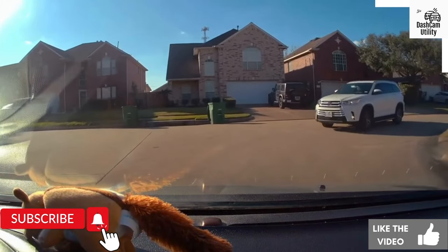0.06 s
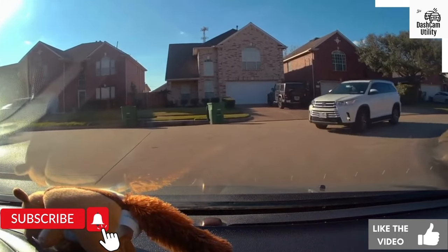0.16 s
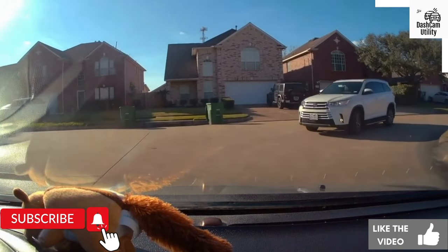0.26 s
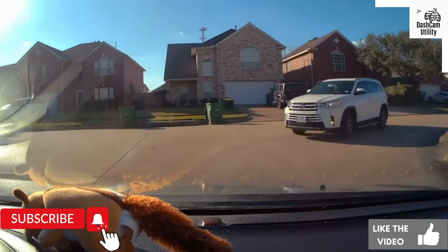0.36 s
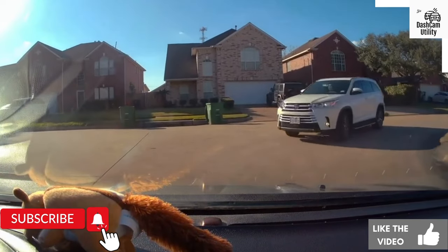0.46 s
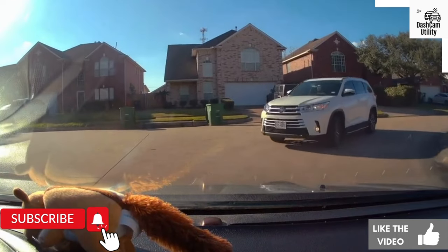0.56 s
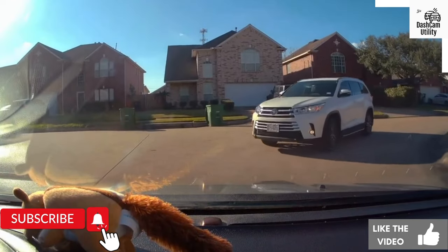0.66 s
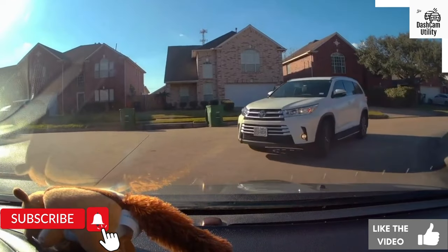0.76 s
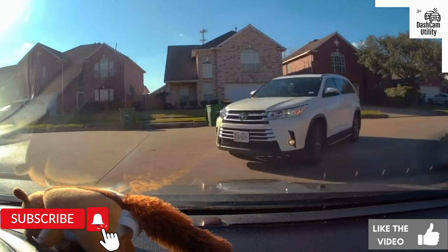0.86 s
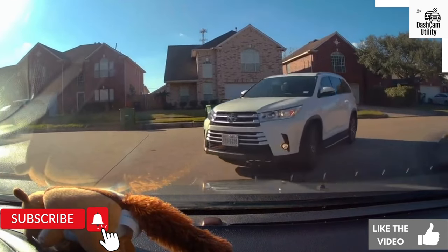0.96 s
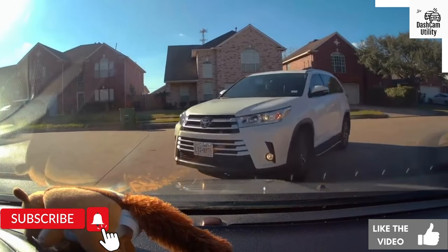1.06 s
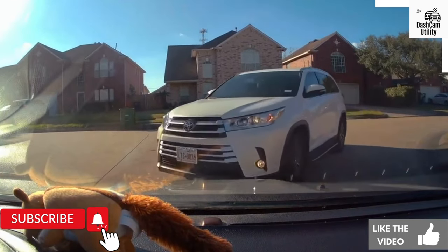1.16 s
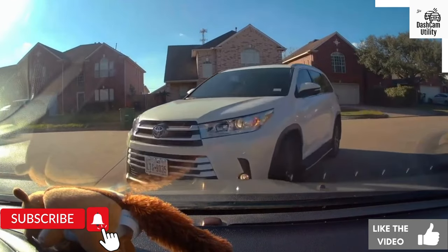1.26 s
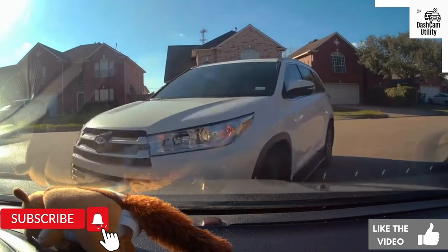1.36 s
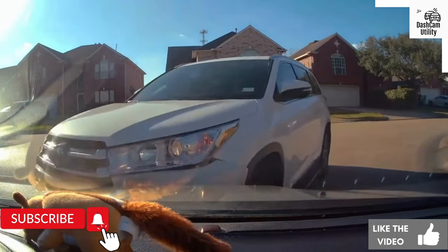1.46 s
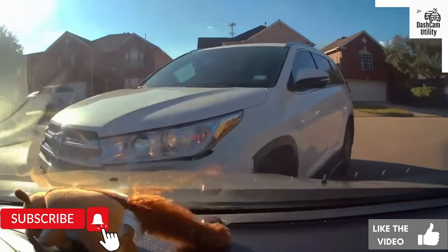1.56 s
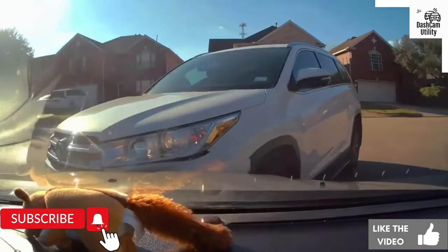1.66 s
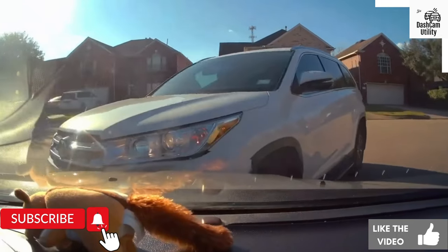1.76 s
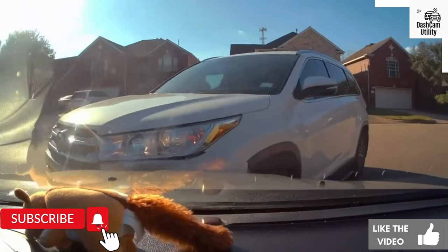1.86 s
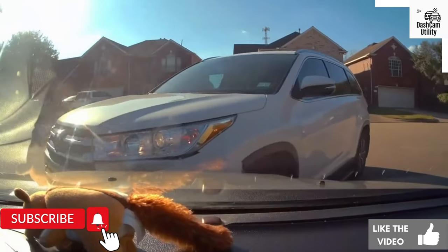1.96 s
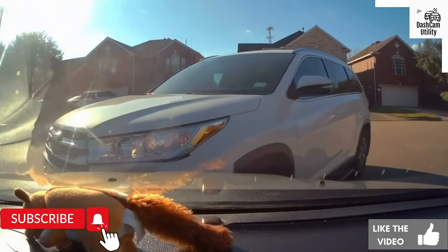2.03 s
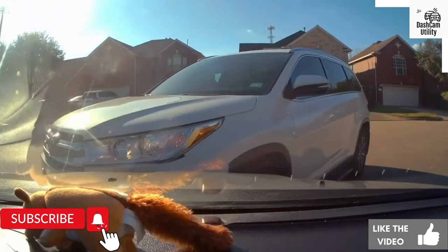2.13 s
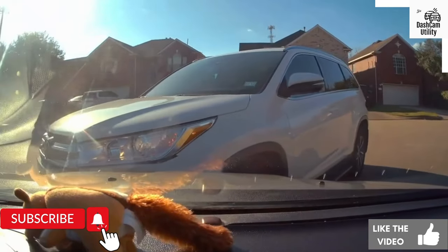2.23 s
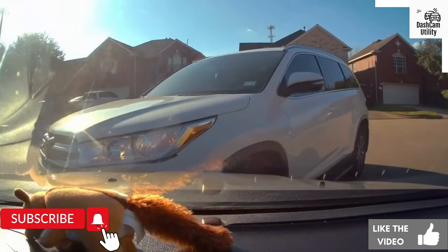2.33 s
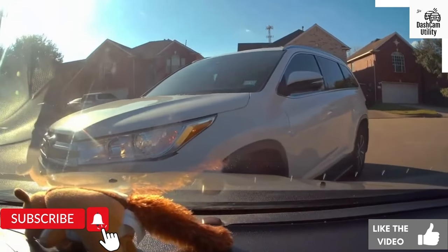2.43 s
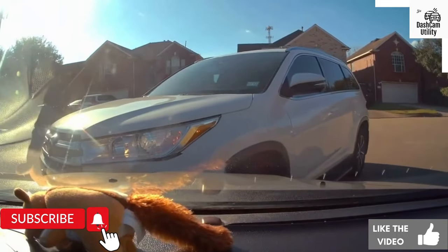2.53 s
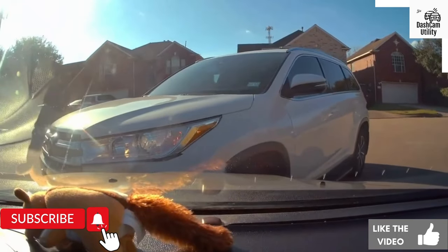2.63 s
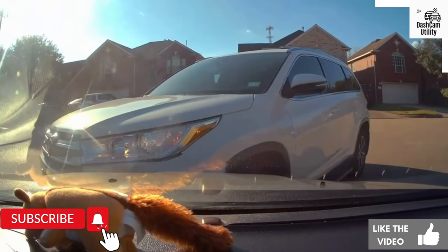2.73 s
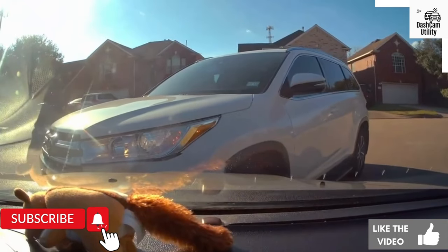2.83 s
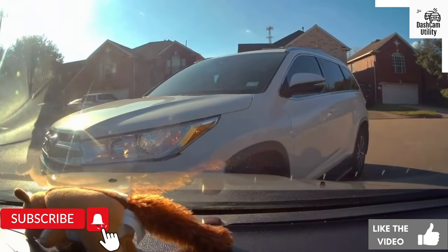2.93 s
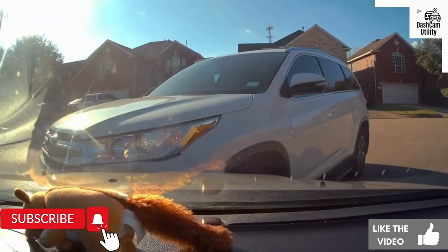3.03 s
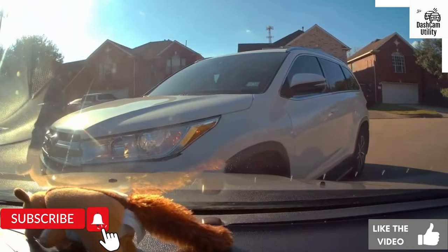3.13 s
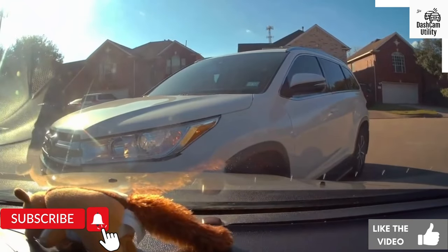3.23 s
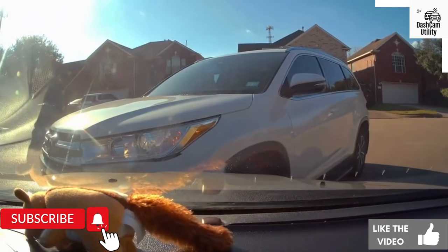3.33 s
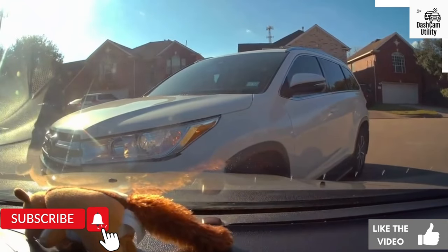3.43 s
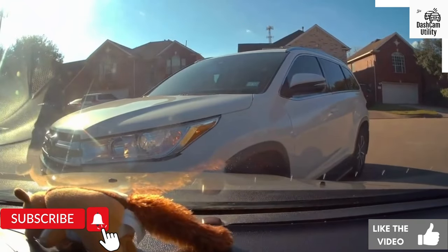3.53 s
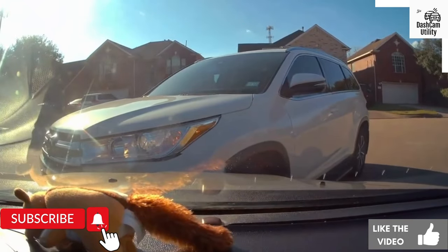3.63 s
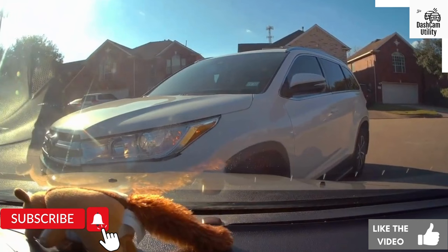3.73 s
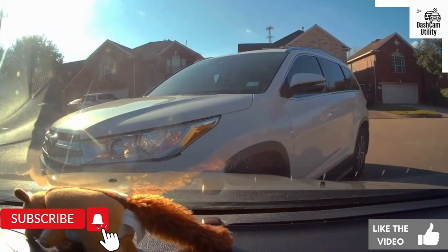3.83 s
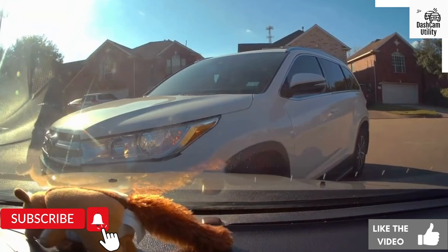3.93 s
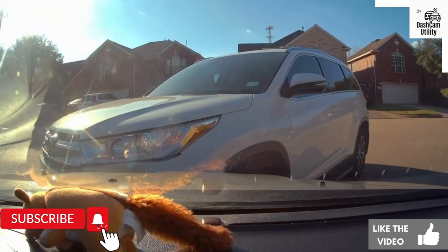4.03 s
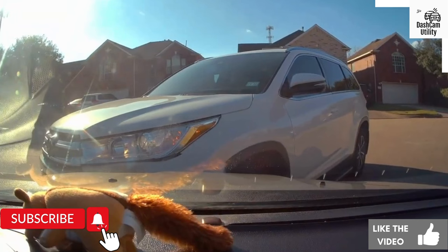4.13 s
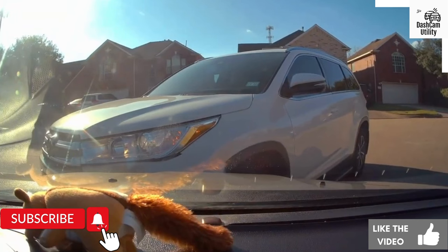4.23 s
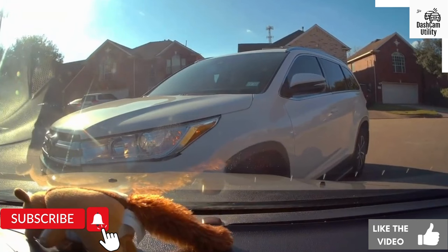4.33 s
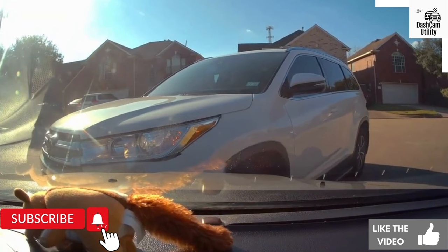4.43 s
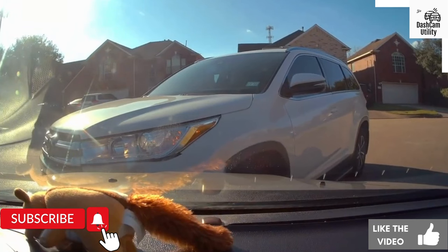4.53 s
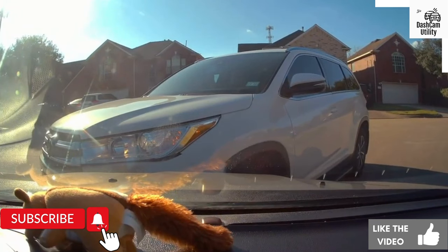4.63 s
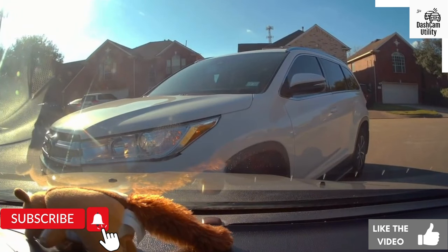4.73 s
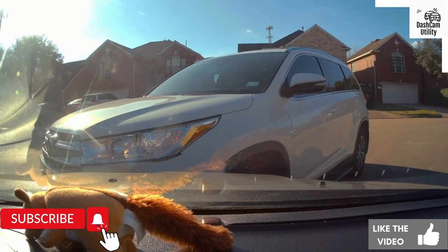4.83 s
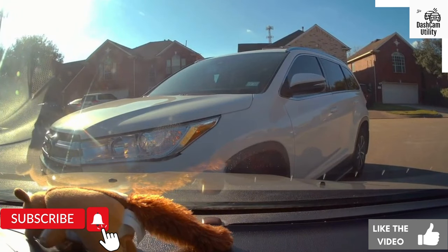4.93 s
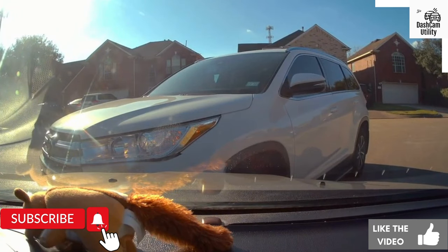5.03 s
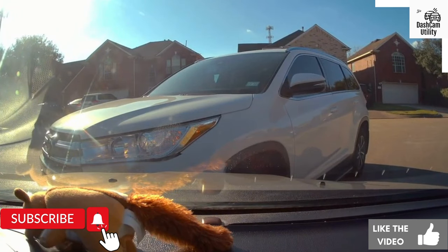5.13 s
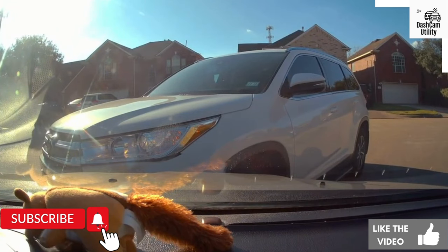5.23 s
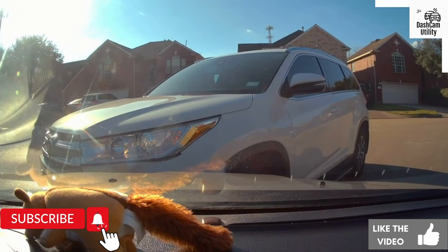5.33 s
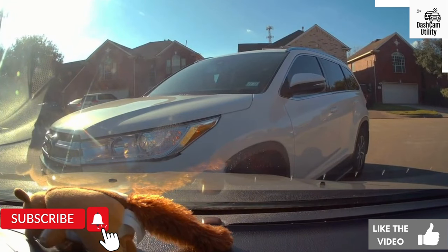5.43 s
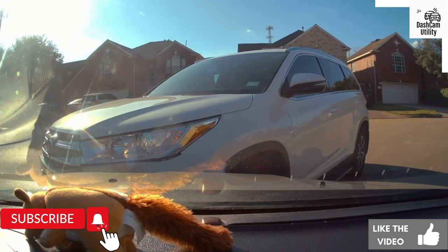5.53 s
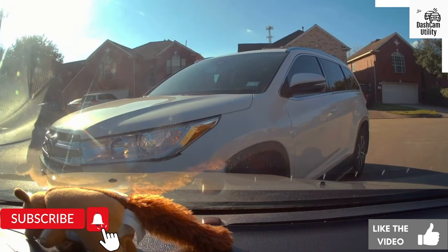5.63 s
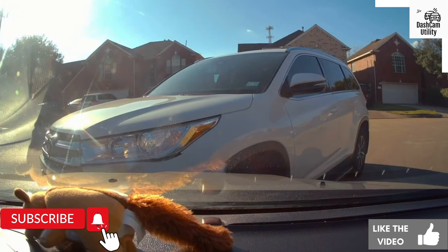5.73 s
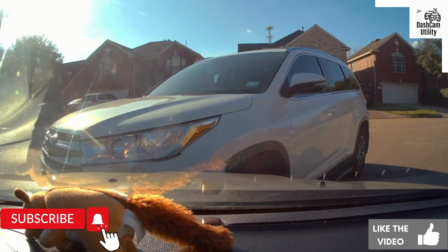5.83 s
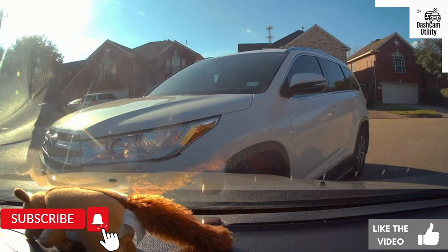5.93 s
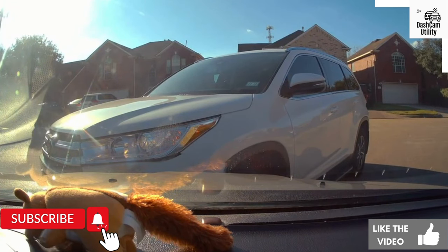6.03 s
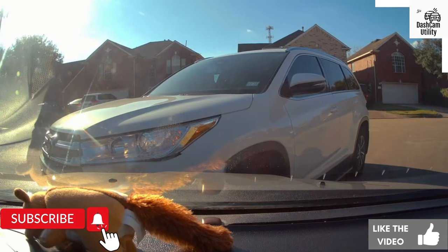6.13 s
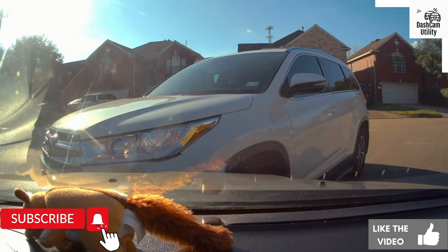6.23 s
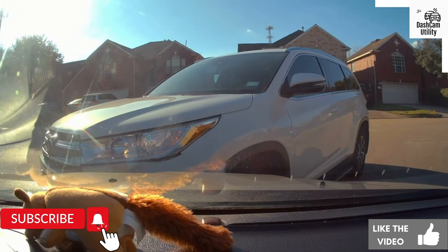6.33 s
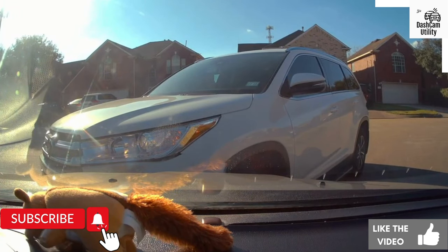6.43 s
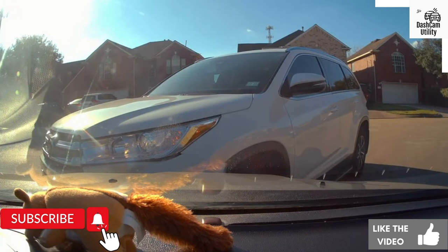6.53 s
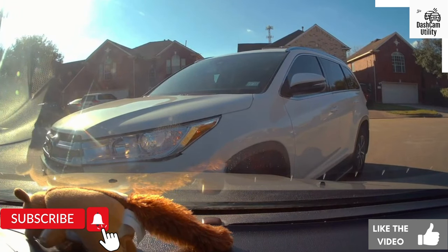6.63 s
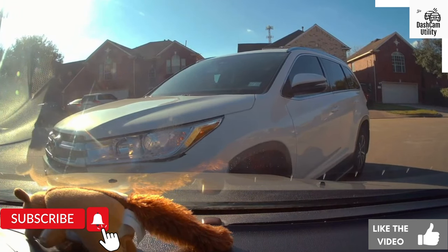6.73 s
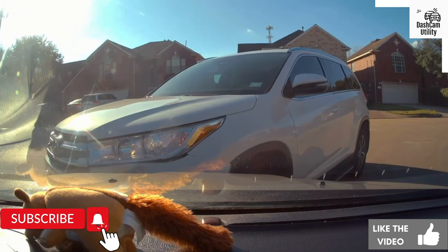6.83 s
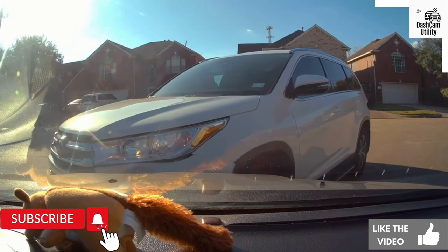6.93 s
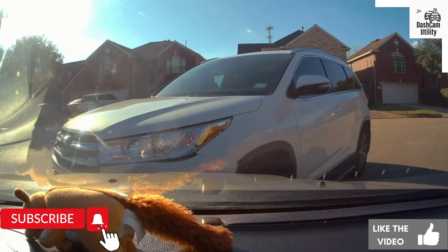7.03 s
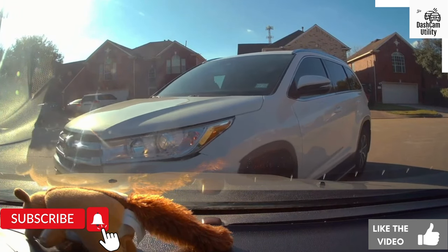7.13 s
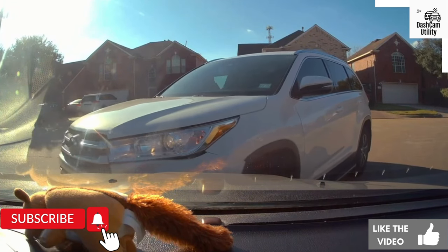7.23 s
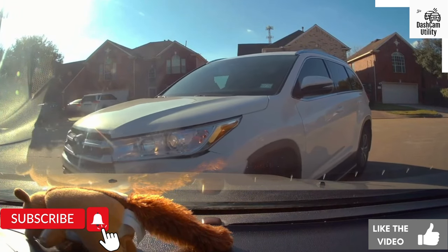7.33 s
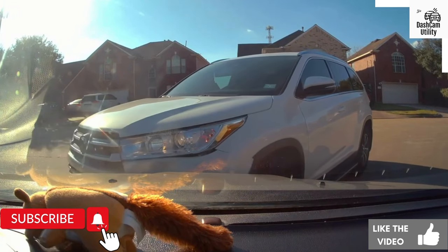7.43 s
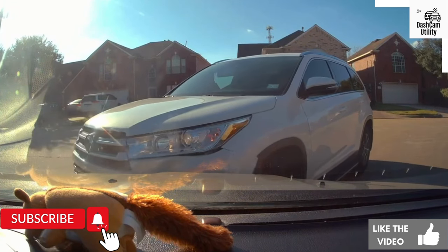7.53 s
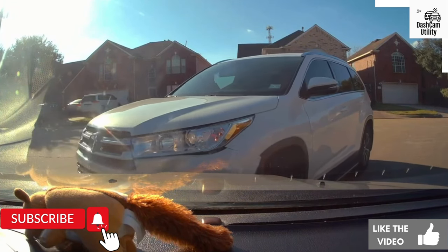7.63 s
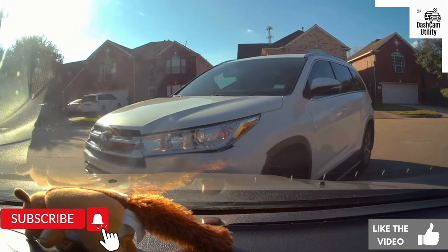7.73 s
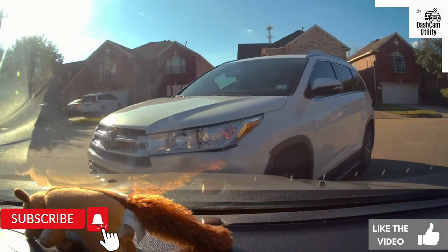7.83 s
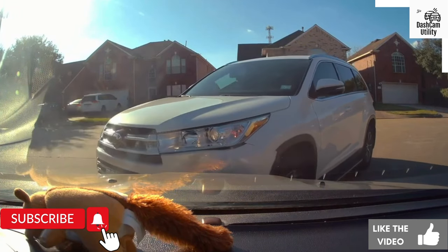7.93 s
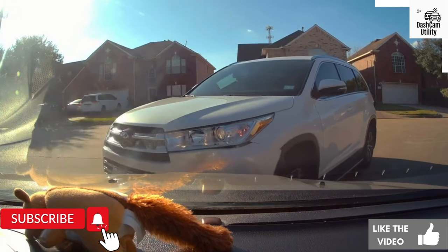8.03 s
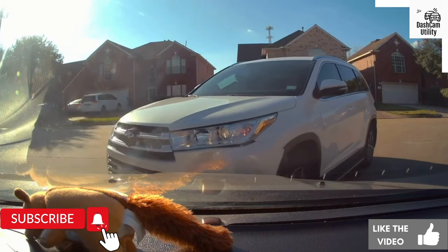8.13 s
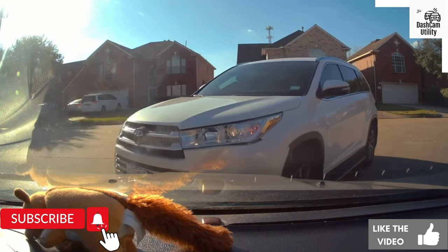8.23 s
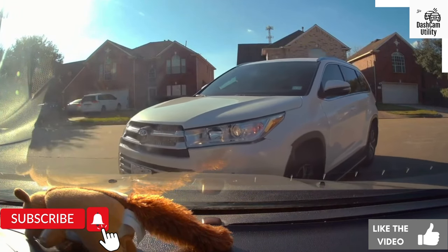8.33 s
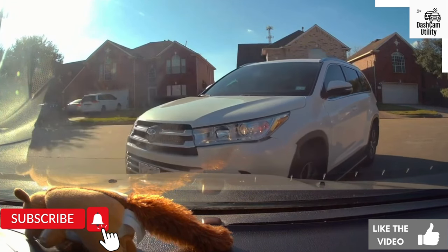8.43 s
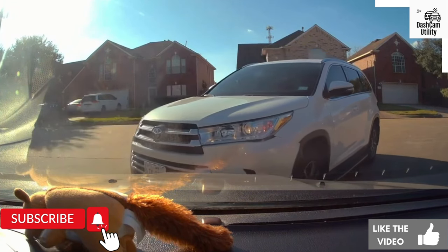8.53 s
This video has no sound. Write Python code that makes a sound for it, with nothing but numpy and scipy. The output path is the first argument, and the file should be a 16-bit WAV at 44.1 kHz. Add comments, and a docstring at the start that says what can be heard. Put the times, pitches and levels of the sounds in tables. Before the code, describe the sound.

Inside a quietly rumbling car, braking tyres drone, then a sudden booming crash crunches metal and plastic, debris trickles, and loose things knock afterwards.

```python
"""A hard boom and crunch breaks into the quiet cabin of a car as it is hit head-on at low speed.
The microphone sits on the dashboard, close to the trim; the front end buckles a bonnet's length away.
The blow rings the body modes and overloads the microphone; random fractures make crunch and plastic debris.
Behind it the engine, a stack of sines, sinks to idle over tyre and vent noise. Loose things knock about
the cabin, and short runs of slips scrape the trim, mostly after the crash."""
import sys
import numpy as np
from scipy import signal
from scipy.fft import rfft, irfft, next_fast_len
from scipy.io import wavfile
from scipy.ndimage import uniform_filter1d

SR = 44100
rng = np.random.default_rng(int(sys.argv[2]) if len(sys.argv) > 2 else 0)


def int16_out(signal):
    """Quantize to a 16-bit WAV file."""
    q = np.round(np.clip(np.atleast_2d(signal).T, -1, 1) * 32767)
    wavfile.write(sys.argv[1], SR, q.astype(np.int16))


N = 377937
TIME = np.arange(N) / SR
SHORT = TIME[:SR // 2]  # time axis of a single hit, half a second

# Every spectrum gives a colour only, columns: f/Hz, relative level/dB
# low rumble through the cabin
RUMBLE_COLOUR = [(15, -16), (30, 6), (60, -1.5), (120, -2), (190, -3), (260, -7.5), (380, -9.5), (500, -19),
                 (750, -27), (1500, -46)]
# air from the vents, also the scrub of braked tyres
AIR_COLOUR = [(300, -22.5), (600, -3), (820, -4.5), (970, 4.5), (1250, -5), (1700, -17), (2300, -18.5),
              (2900, -15.5), (3600, -23.5), (4200, -21), (4700, -22.5), (5700, -28.5), (7600, -28)]
# tyres on concrete
TYRE_COLOUR = [(12, -15), (25, -3), (70, 8.5), (100, -4), (130, -1.5), (170, 2), (230, -5), (500, -59.5)]
# shuddering chassis
CHASSIS_COLOUR = [(12, -24), (25, -2), (38, -9), (53, -2), (70, -8.5), (100, -7), (140, -25), (300, -68.5)]
# booming car body
BODY_COLOUR = [(40, -29), (90, -10.5), (120, 6.5), (150, 0), (190, 2), (260, -3), (340, -4.5), (430, -13),
               (600, -19.5), (1500, -69)]
# bent sheet metal panels
PANEL_COLOUR = [(200, -25), (400, 5), (480, -7.5), (555, 3.5), (610, -3.5), (670, 2.5), (760, -4),
                (900, -5.5), (1040, -0.5), (1200, -8.5), (1370, -12), (1650, -28.5), (2200, -23.5),
                (5000, -54.5)]
# hard plastic shards, also sand under the tyres and creaking trim
SHARD_COLOUR = [(700, -14.5), (1050, 7), (1400, 9.5), (1650, 3), (1900, -5.5), (2200, -2), (2550, 1),
                (2900, 5.5), (3250, -3), (3500, -7.5), (3850, -4), (4150, -10.5), (4650, -0.5),
                (5200, -15.5), (5700, -18.5), (7500, -23.5)]
# plastic trim close to the microphone
TRIM_COLOUR = [(300, 11), (600, -7), (1200, -6), (1600, 5), (2100, 2.5), (2500, 5.5), (2950, 10.5),
               (3250, -1.5), (3500, -1), (4050, -3), (4650, 6), (5200, 0.5), (5700, -6), (6300, -1),
               (7600, -7.5)]
# dashboard drumming under a scrape
DASH_COLOUR = [(40, -26), (85, -24.5), (122, 17), (155, -3.5), (220, 2), (300, -6), (420, -13.5),
               (800, -65)]
# fragments tumbling together
CLATTER_COLOUR = [(600, -8), (1000, 19.5), (1350, 1.5), (1900, -12), (2450, 2), (2900, 8.5), (3450, -11.5),
                  (3850, -1.5), (4150, -10), (4650, 0), (5600, -14.5), (7500, -22)]
# plastic crackling under strain
CRACKLE_COLOUR = [(400, -16), (800, -0.5), (1200, 6), (1900, -24), (2700, -3), (4200, -10), (7500, -27)]
# splitting bumper and grille
CRACK_COLOUR = [(300, -6.5), (700, 10.5), (1300, 18), (1900, 2), (2900, 4.5), (3600, -4), (4700, -2.5),
                (5800, -15), (7500, -10)]
# things shifting in the cabin
RUSTLE_COLOUR = [(400, -10), (1100, 10), (1700, -1.5), (2900, -1), (3600, -6), (4700, -8), (7500, -15.5)]

# level of the cabin background, columns: t/s, level/dB (the vent air follows by half)
BACKGROUND_LEVEL = [(0, 6), (3, 4), (4.1, -1.5), (5.6, 5), (6.4, 3), (7.7, 5), (8.57, -1)]
RUMBLE_DB, AIR_DB = -53.5, -67  # before the background level is added

# engine sinking to idle and hunting a little, columns: t/s, firing rate f/Hz
FIRING_RATE = [(0, 36.45), (.58, 34.98), (.82, 31.2), (1.4, 31.64), (2, 28.63), (3.35, 27.11),
               (3.75, 25.62), (4.3, 26.84), (5, 24.91), (7.1, 27.23), (7.8, 25.37), (8.57, 25.36)]
# upper engine orders, columns: multiple of the firing rate, mean level/dB
UPPER_ORDERS = [(3, -66.5), (4, -60.5), (5, -70), (6, -66), (7, -61.5), (9, -71.5), (11, -70.5)]
# the two lowest orders at idle, and their growth with the firing rate
IDLE_HZ, FIRST_DB, FIRST_DB_PER_HZ, SECOND_DB, SECOND_DB_PER_HZ = 25.7, -48.5, 0.3, -61.5, 1

# the tyres roll until the car stops, then die away
ROLL_DB, STOP_S, STOP_T60_S = -51.5, 2.53, 3.1
# the brakes bite and ease as the car slows: tyre drone, scrub and grit
BRAKE_S, BRAKE_RISE_S, BRAKE_T60_S = 0.6, 0.23, 3.3
DRONE_DB, SCRUB_DB, GRIT_DB = -44, -56.5, -70

# In the event tables below, level/dB is the drive of a layer, before its share in the mix and its shaping
# shifting things in the cabin, columns: peak t/s, rise/s, t60/s, level/dB
RUSTLE_SWELLS = [(4.6, 0.041, .5, -76), (4.88, .2, .6, -75), (6.04, 0.22, 0.67, -69.5),
                 (6.47, .1, 2.1, -67), (7.76, 0.19, 1.1, -69.5)]
SQUEAK_S, SQUEAK_LENGTH_S, SQUEAK_DB = 4.07, 0.035, -73
SQUEAK_HZ, SQUEAK_RISE_HZ_PER_S = 2650, 27000
# clicks of the trim, columns: t/s, f/Hz, ring level/dB, click level/dB, t60/s, treble edge f/Hz
TRIM_TICKS = [(.567, 900, -45.5, -58, 0.084, 5000), (.661, 1096, -39, -58, 0.027, 7000),
              (1.025, 1050, -41, -68, 0.031, 4000), (3.561, 1900, -66.5, -56, .08, 2800),
              (4.908, 1048, -41.5, -61, 0.021, 1800), (5.125, 830, -41, -51, 0.043, 1500),
              (6.494, 1083, -20.5, -45, .024, 4000), (6.505, 1110, -23.5, -54, 0.025, 8000),
              (6.674, 1310, -44, -68, 0.019, 4500), (6.894, 1000, -40, -57, 0.047, 3500),
              (6.918, 1140, -36, -51, 0.035, 3500), (6.94, 2940, -60, -55.5, .08, 7000),
              (6.966, 1010, -47.5, -58, 0.12, 4500), (7.508, 1130, -33, -63, 0.033, 4000)]
# scrapes on the trim, columns: t/s, length/s, upper resonance f/Hz, its level/dB,
# lower resonance level/dB, rasp level/dB, drumming level/dB, t60/s, treble edge f/Hz
TRIM_SCRAPES = [(1.128, 0.015, 1040, -36, -38.5, -45.5, -34, 0.074, 4300),
                (5.194, 0.076, 1050, -34.5, -40.5, -41, -38, 0.077, 5500),
                (5.231, 0.048, 1070, -30.5, -37, -35.5, -34, .04, 12000),
                (5.284, 0.0089, 1038, -27.5, -35.5, -39.5, -27, 0.065, 7000),
                (5.314, 0.0067, 1030, -33.5, -37, -40, -29.5, 0.078, 9000),
                (6.491, 0.024, 1280, -41, -61, -44.5, -40.5, .025, 6500),
                (6.517, 0.012, 1160, -40, -55, -44, -36, 0.038, 6500),
                (7.509, .01, 1098, -45.5, -42, -53, -37, 0.089, 4490)]
LOWER_HZ = 555  # lower resonance of the trim
# bumps of the suspension and of loose things in the cabin, columns:
# t/s, middle thud f/Hz, thud level/dB, thud t60/s, clack level/dB, creak level/dB
CABIN_BUMPS = [(0.03, 59.5, -34.5, 0.39, -57, -60), (0.482, 143, -26, 0.37, -44.5, -68),
               (0.529, 42, -34.5, 0.64, -50, -71), (0.709, 170, -34, 0.13, -58, -55.5),
               (3.014, 127, -42.5, 0.33, -47.5, -65), (3.158, 120, -41.5, 0.16, -50.5, -81),
               (4.579, 114.1, -62, 0.25, -64, -66.5), (4.907, 134, -47.5, 0.11, -53.5, -78),
               (5.012, 292, -45.5, 0.08, -64, -74), (5.331, 119, -33, 0.22, -41.5, -56),
               (6.669, 180, -38, 0.078, -44, -64.5), (6.681, 181.4, -33.5, 0.083, -53, -73),
               (6.741, 177.2, -35.5, .1, -44, -79), (6.754, 265, -36, 0.2, -37.5, -58.5),
               (6.815, 185, -26, 0.11, -50, -61), (6.848, 297, -37, 0.11, -40.5, -61),
               (6.888, 190, -46, 0.11, -43.5, -61), (6.908, 184, -34, 0.088, -42, -67),
               (6.917, 161, -42, 0.14, -42.5, -58), (6.95, 115.5, -34.5, 0.1, -55, -77),
               (7.003, 182.5, -35, 0.16, -44.5, -58), (7.029, 94, -40.5, 0.22, -63, -78),
               (7.064, 153, -44, 0.087, -60, -80), (7.565, 150, -29.5, 0.094, -58, -74),
               (7.595, 55.6, -33, .13, -56, -65.5), (7.634, 75, -35, 0.088, -66, -64)]
BUMP_CLACK_HZ = 492  # shared by all bumps
THUD_SAG, SAG_S = 0.18, 0.013  # share of the pitch a thud sags by, and time constant

# handfuls of tumbling fragments, columns: t/s, length/s, level/dB
FRAGMENT_RUNS = [(2.117, 0.045, -47.5), (2.161, 0.05, -50.5), (2.31, 0.012, -60.5), (2.365, .02, -52),
                 (2.445, .012, -47.5), (2.639, .008, -50.5), (2.717, 0.013, -45), (2.744, 0.013, -47),
                 (2.863, 0.038, -53), (2.905, 0.023, -52), (2.983, 0.022, -63), (3.037, 0.051, -57.5),
                 (3.188, 0.022, -63), (3.245, 0.01, -61), (3.363, 0.028, -64.5)]
# splinters that snap off or land, columns: t/s, f/Hz, level/dB, t60/s
LARGE_SPLINTERS = [(1.4715, 2920, -0.5, 0.014), (1.52, 4800, -22, 0.014), (1.561, 3230, -16, 0.0096),
                   (1.666, 4600, -39, 0.016), (2.02, 3860, -37, 0.032), (2.464, 4570, -27, 0.014),
                   (2.654, 2930, -39, 0.034), (2.723, 4670, -35, 0.035), (2.747, 4700, -34, 0.037),
                   (3.04, 4730, -48, 0.03)]
# splitting bumper and grille, columns: t/s, level/dB, t60/s
PLASTIC_CRACKS = [(1.518, -27.5, 0.016), (1.56, -32, 0.058), (1.6, -39, 0.046), (1.665, -43, 0.12),
                  (1.789, -35.5, 0.049), (1.822, -43, .035), (1.995, -50.5, 0.0242), (2.461, -46, 0.052),
                  (2.481, -36.5, 0.025), (2.538, -32.5, 0.064), (2.654, -48.5, .04), (2.668, -49, 0.044),
                  (2.721, -52, 0.026)]
# the wreck lurches at the blow, dips back and rocks to rest, columns: peak t/s, rise/s,
# chassis shudder level/dB, body level/dB, panel crunch level/dB, shards level/dB
WRECK_LURCHES = [(1.525, 0.068, -10.5, -19, -30.5, -40), (1.95, 0.31, -22, -24, -37, -45.5),
                 (2.34, 0.19, -30, -32, -55.5, -57), (2.46, 0.29, -34, -40.5, -40.5, -50),
                 (2.66, 0.11, -45, -39.5, -69, -53)]
CHASSIS, BODY_SHELL, PANELS, PLASTIC = range(4)  # order of those four levels
# how long each part takes to settle after a lurch
SHUDDER_T60_S, BODY_T60_S, PANEL_T60_S, SHARD_T60_S = 1.2, 1.53, 1.56, 1.64
JERK_DB, JERKS_PER_S = 2, 45  # uneven crumpling: spread and rate of the drift
CRACKLE_DB, CRACKLES_PER_S = -15, 78  # level against the panel crunch
# small dents: lowest pitch, range, ring time, level against the panel crunch
DENT_HZ, DENT_OCTAVES, DENT_T60_S, DENT_DB = 324.8, 1.8, 0.16, 0.5
# blows as the front ends crush and rebound, columns: t/s, middle thud f/Hz, thud level/dB,
# clack f/Hz, clack level/dB, crack level/dB, clack t60/s (bell and crack ring in proportion)
CRUSH_BLOWS = [(1.457, 188, -31, 416, -18, -36, 0.038), (1.487, 413, -11, 830, -20, -29.5, 0.092),
               (1.506, 126.6, -4.5, 518, -10, -30, 0.12), (1.519, 130, -15.5, 505, -18, -26, 0.22),
               (1.532, 190, -18.5, 1010, -17.5, -41.5, 0.097), (1.556, 191, -17, 966, -19, -26, 0.11),
               (1.591, 120, -30, 590, -24.5, -35.5, 0.09), (1.624, 169, -29.5, 520, -21, -60, 0.085),
               (1.645, 154, -16, 465, -37, -48, .09), (1.665, 130, -20, 1004, -23.5, -56, 0.091),
               (1.684, 109.5, -19, 1028, -27.5, -31, 0.14), (1.726, 202, -16, 983, -24, -26, 0.073),
               (1.754, 282, -22.5, 1043, -21.5, -36.5, 0.07), (1.79, 278.6, -16, 430, -26, -30, 0.068),
               (1.809, 339, -22, 1036, -23.5, -41, 0.1), (1.824, 240, -20.5, 482, -16.5, -23.5, 0.11),
               (1.85, 164, -25, 722, -16, -42, 0.059), (1.87, 202, -23, 630, -27.5, -47, 0.051),
               (1.9, 149, -17, 455, -45, -44, 0.064), (1.951, 214, -17.5, 557, -32, -51, 0.1),
               (1.996, 181.5, -21.5, 966, -27, -38, 0.039), (2.023, 180, -29, 658, -30, -63, 0.15),
               (2.052, 134, -22.5, 478, -42, -67, 0.098), (2.079, 141, -35, 973, -31.5, -39, 0.49),
               (2.188, 200, -45, 457, -31.5, -55, 0.2), (2.259, 113.3, -31, 606, -33.5, -55, 0.085),
               (2.377, 154, -22.5, 405, -38.5, -63, 0.089), (2.407, 343, -22.5, 899, -23.5, -36.5, 0.077),
               (2.462, 140, -20.5, 500, -43, -41, 0.066), (2.471, 328, -25, 474, -29, -51, 0.055),
               (2.482, 186, -26, 545, -17, -40, 0.065), (2.509, 149, -45, 1064, -28, -35, 0.069),
               (2.536, 282, -29, 680, -21, -30, 0.089), (2.553, 290, -41.5, 1320, -27.5, -42, 0.098),
               (2.602, 110, -44, 970, -26, -53, 0.082), (2.618, 62, -34, 800, -40, -62, .06),
               (2.655, 109, -39, 1015, -35, -40, 0.075), (2.666, 200, -46, 553, -31, -42, 0.18),
               (2.712, 149, -35, 554, -31.5, -52, 0.21), (2.781, 147, -31, 460, -50, -66, 0.086)]
# the car body under the blow, columns: delay/s, mean f/Hz, level/dB, t60/s
BLOW_MODES = [(0.00045, 184, 4, 0.29), (0.0034, 390, -8.5, 0.38), (0.00033, 440, -12, 0.23),
              (.002, 555, -15, .3), (0.016, 669, -17.5, .3), (0.008, 940, -22.5, .25),
              (0.034, 122, -7.5, 0.35), (0.016, 54, -3, 0.3)]
TOUCH_S, IMPACT_S = 1.445, 1.451  # bumpers first touch, then the blow

CUTOFF_HZ = 7600  # upper edge of the recorder's band


def amp(db):
    """Decibels to gain."""
    return 10 ** (np.asarray(db) / 20)


def unit(x):
    """Scale to rms 1."""
    return x / np.sqrt(np.mean(x ** 2))


def burst(x):
    """Scale a hit to rms 1 over its first 30 ms."""
    return x / np.sqrt(np.mean(x[:int(0.03 * SR)] ** 2))


def curves(rows):
    """Each column of a table, joined by straight lines in time."""
    s, *columns = np.transpose(rows)
    return [np.interp(TIME, s, c) for c in columns]


def colour(x, spectrum):
    """Causal minimum-phase filter with the given response, built by folding its cepstrum."""
    size = next_fast_len(len(x) + SR // 10, True)
    size += size % 2
    table_hz, table_db = np.transpose(spectrum)
    bin_hz = np.arange(size // 2 + 1) * SR / size
    gain_db = np.interp(np.log(bin_hz + 1), np.log(table_hz), table_db)
    cepstrum = irfft(np.log(amp(gain_db)))
    cepstrum[1:size // 2] *= 2
    cepstrum[size // 2 + 1:] = 0
    response = np.exp(rfft(cepstrum))
    return irfft(rfft(x, size) * response)[:len(x)]


def steady(x, span_s):
    """Even out the slow swells of a noise, leaving rms near 1 and its fine grain."""
    size = int(span_s * SR)
    power = uniform_filter1d(uniform_filter1d(x ** 2, size), size)
    return x / np.sqrt(np.abs(power) + 1e-18)


def walk(rate):
    """Slow random drift with a spread near 1, through rate new points a second."""
    points = rng.standard_normal(1000)
    return np.interp(TIME * rate, np.arange(len(points)), points)


def snaps(count, rate, spread_db):
    """Tiny fractures at random times; a positive spread makes most small and a few large."""
    chance = rng.random(count)
    size = np.minimum(rng.exponential(size=count), 4)
    sign = rng.choice([-1, 1], count)
    return (chance < rate / SR) * sign * amp(spread_db * size)


def fade(t, t60):
    """Exponential decay by 60 dB in t60 seconds."""
    return np.exp(-np.log(1000) * t / t60)


def swell(peak_s, rise_s, t60):
    """Rise along a square curve to 1 at peak_s, then decay."""
    rise = np.clip((TIME - peak_s) / rise_s + 1, 0, 1)
    return rise ** 2 * fade(np.maximum(TIME - peak_s, 0), t60)


def add(out, s, x):
    """Mix x into out from time s."""
    start = int(s * SR)
    out[start:start + len(x)] += x[:N - start]


def rush(spectrum, flicker_db):
    """Coloured noise whose level flickers."""
    return unit(colour(rng.standard_normal(N), spectrum)) * amp(flicker_db * walk(rate=12))


def ring(hz, t60, rise_s):
    """One struck mode; a softer contact makes it swell more slowly."""
    return np.sin(2 * np.pi * hz * SHORT) * fade(SHORT, t60) * (1 - fade(SHORT, rise_s))


def resonance(x, hz, width_hz):
    """Band-pass round one resonance."""
    return signal.lfilter(*signal.iirpeak(hz, hz / width_hz, fs=SR), x)


def dull(x, top_hz):
    """Low-pass a sound above top_hz."""
    return signal.sosfilt(signal.butter(4, top_hz, fs=SR, output="sos"), x)


def reflect(x, wet, t60):
    """Add dense short echoes: a decaying noise tail of unit energy."""
    tail = rng.standard_normal(len(SHORT)) * fade(SHORT, t60)
    return x + wet * signal.fftconvolve(x, tail / np.linalg.norm(tail))[:len(x)]


def rattle(spectrum, t60, rate, spread_db):
    """A contact and its dying chatter of rebounds, ringing one part of the car."""
    contacts = snaps(len(SHORT), rate, spread_db) + 0.036 * rng.standard_normal(len(SHORT))
    chatter = steady(contacts, span_s=0.0089)
    return burst(colour(chatter * fade(SHORT, t60), spectrum))


def thud(hz, t60, rise_s):
    """A low knock whose pitch sags as the contact slackens."""
    pitch = hz * (1 + THUD_SAG * (np.exp(-SHORT / SAG_S) - 0.5))
    tone = np.sin(2 * np.pi * np.cumsum(pitch) / SR)
    return burst(tone * fade(SHORT, t60) * (1 - fade(SHORT, rise_s)))


def tinkle(hz, t60):
    """A small hard fragment: two briefly ringing modes, the second at 0.81 of the pitch, and a gritty skid."""
    modes = ring(hz, t60, rise_s=0.004) + 0.5 * ring(0.81 * hz, t60, rise_s=0.002)
    grit = rng.standard_normal(len(SHORT))
    for _ in range(2):
        grit = resonance(grit, hz, width_hz=1200)
    return 0.5 * modes + 0.45 * grit * fade(SHORT, t60)


def settling(t60, part):
    """Level of one part of the wreck: from the blow on, every lurch stirs it anew; powers add."""
    struck = 1 - fade(np.maximum(TIME - IMPACT_S, 0), t60=0.1)
    power = np.zeros(N)
    for s, rise_s, *levels_db in WRECK_LURCHES:
        power += (amp(levels_db[part]) * swell(s, rise_s, t60)) ** 2
    return struck * np.sqrt(power)


def cabin():
    """Rumble through the body and soft, steadier air from the vents, both shaped noise."""
    level_db, = curves(BACKGROUND_LEVEL)
    rumble = amp(RUMBLE_DB + level_db) * rush(RUMBLE_COLOUR, flicker_db=1.64)
    air = amp(AIR_DB + level_db / 2) * rush(AIR_COLOUR, flicker_db=1.2)
    return rumble + air


def tyres():
    """Tyres roll on concrete until the car stops; under braking they drone, scrub and crackle over sand."""
    rolling = fade(np.maximum(TIME - STOP_S, 0), STOP_T60_S)
    braking = swell(BRAKE_S, BRAKE_RISE_S, BRAKE_T60_S)
    drone_level = np.hypot(amp(ROLL_DB) * rolling, amp(DRONE_DB) * braking)
    drone = drone_level * rush(TYRE_COLOUR, flicker_db=7.5)
    scrub = amp(SCRUB_DB) * rush(AIR_COLOUR, flicker_db=1)
    sand = amp(GRIT_DB) * unit(colour(snaps(N, rate=350, spread_db=10.0), SHARD_COLOUR))
    return drone + braking * (scrub + sand)


def engine():
    """Four cylinders felt as a deep throb, stronger above idle; the upper orders waver."""
    hz, = curves(FIRING_RATE)
    phase = 2 * np.pi * np.cumsum(hz) / SR
    out = amp(FIRST_DB + FIRST_DB_PER_HZ * (hz - IDLE_HZ)) * np.sin(phase)
    out += amp(SECOND_DB + SECOND_DB_PER_HZ * (hz - IDLE_HZ)) * np.sin(2 * phase)
    for order, db in UPPER_ORDERS:
        level = amp(db + 1.5 * walk(rate=14.0))
        out += level * np.sin(round(order) * phase + 0.96 * walk(rate=5.6))
    return np.sqrt(2) * out  # so that levels are rms


def rustles():
    """Faint, grainy swells of things shifting in the cabin: dense snaps under a drifting level."""
    level = sum(amp(db) * swell(s, rise_s, t60) for s, rise_s, t60, db in RUSTLE_SWELLS)
    grain = unit(colour(snaps(N, rate=3300, spread_db=5), RUSTLE_COLOUR))
    return level * amp(3.6 * walk(rate=30)) * grain


def squeak():
    """One faint, short squeak: a sine that slides upward."""
    out, t = np.zeros(N), TIME[:int(SQUEAK_LENGTH_S * SR)]
    phase = 2 * np.pi * np.cumsum(SQUEAK_HZ + SQUEAK_RISE_HZ_PER_S * t) / SR
    envelope = np.sin(np.pi * t / SQUEAK_LENGTH_S)
    add(out, SQUEAK_S, amp(SQUEAK_DB) * envelope * np.sin(phase))
    return out


def ticks():
    """Plastic trim lets go with a click and a short ring of two modes."""
    out = np.zeros(N)
    for s, hz, ring_db, click_db, t60, top_hz in TRIM_TICKS:
        click = 0.5 * dull(rattle(TRIM_COLOUR, t60, rate=1500, spread_db=-0.5), top_hz)
        modes = ring(hz, t60, rise_s=0.009) + 0.4 * ring(1.24 * hz, t60, rise_s=0.009)
        add(out, s, amp(ring_db) * modes + amp(click_db) * click)
    return out


def scrapes():
    """Something slides in jerks: rapid slips ring two modes of the trim and drum on the dashboard."""
    out = np.zeros(N)
    for s, length, upper_hz, upper_db, lower_db, rasp_db, drum_db, t60, top_hz in TRIM_SCRAPES:
        bite = 1 - fade(SHORT, t60=0.008 + 0.7 * length)
        slips = snaps(len(SHORT), rate=1800, spread_db=3)
        after = np.maximum(SHORT - length, 0)
        trim = amp(rasp_db) * dull(steady(colour(slips, TRIM_COLOUR), span_s=0.0034), top_hz)
        for hz, db in ((upper_hz, upper_db), (LOWER_HZ, lower_db)):
            mode = resonance(resonance(slips, hz, width_hz=130), hz, width_hz=400)
            trim += amp(db) * steady(mode, span_s=0.012)
        drum = amp(drum_db) * steady(colour(slips, DASH_COLOUR), span_s=0.12)
        add(out, s, bite * (trim * fade(after, t60) + drum * fade(after, 2 * t60)))
    return out


def bumps():
    """Padded knocks inside the cabin: a sagging thud, a short clack and a faint creak of trim."""
    out = np.zeros(N)
    for s, thud_hz, thud_db, t60, clack_db, creak_db in CABIN_BUMPS:
        knock = 0.71 * thud(thud_hz, t60, rise_s=0.0062)
        knock += 0.29 * rattle(BODY_COLOUR, t60=0.4, rate=2400, spread_db=5.5)
        sway = 0.16 * rattle(CHASSIS_COLOUR, t60=1.0, rate=320, spread_db=12.0)
        clack = 0.33 * burst(ring(BUMP_CLACK_HZ, t60=0.073, rise_s=0.0077))
        clack += 0.49 * rattle(PANEL_COLOUR, t60=0.13, rate=660, spread_db=0.5)
        creak = 0.63 * rattle(SHARD_COLOUR, t60=0.17, rate=720, spread_db=2.0)
        padded = (amp(clack_db) * clack + amp(creak_db) * creak) * (1 - fade(SHORT, t60=0.011))
        add(out, s, amp(thud_db) * (knock + sway) + padded)
    return out


def clatters():
    """Handfuls of fragments tumble together, a quick run of clicks with a broad, bright sound."""
    out = np.zeros(N)
    for s, length, db in FRAGMENT_RUNS:
        clicks = reflect(snaps(len(SHORT), rate=450, spread_db=3), wet=0.6, t60=0.03)
        tumble = steady(clicks, span_s=0.02) * fade(np.maximum(SHORT - length, 0), t60=0.21)
        add(out, s, amp(db) * burst(colour(tumble, CLATTER_COLOUR)))
    return out


def debris(count=200):
    """A few large splinters and a shower of small ones, each ringing at its own pitch under the bonnet."""
    out, trickle = np.zeros(N), settling(SHARD_T60_S, PLASTIC)
    for s, hz, db, t60 in LARGE_SPLINTERS:
        add(out, s, amp(db) * tinkle(hz, t60))
    for when, pitch, size in rng.random((count, 3)):
        s = 1.5 + 2 * when
        size_db = 11 * size ** 3 - 5
        add(out, s, trickle[int(s * SR)] * amp(size_db) * tinkle(2500 + 2600 * pitch, t60=0.035))
    return reflect(out, wet=0.34, t60=0.12)


def cracks():
    """Bumper and grille split: each break is a dense, bright rip of tiny fractures."""
    out = np.zeros(N)
    for s, db, t60 in PLASTIC_CRACKS:
        add(out, s, amp(db) * rattle(CRACK_COLOUR, t60, rate=5000, spread_db=2))
    return out


def dents(count=70):
    """Sheet metal pops as it buckles, each dent with a short ring of its own pitch."""
    out, strain = np.zeros(N), settling(PANEL_T60_S, PANELS)
    for when, pitch, size in rng.random((count, 3)):
        s = 1.5 + 1.5 * when
        pop = ring(DENT_HZ * 2 ** (DENT_OCTAVES * pitch), DENT_T60_S, rise_s=0.003)
        level = amp(DENT_DB) * strain[int(s * SR)] * (1 + size) * (1 - pitch / 2)
        add(out, s, level * pop)
    return out


def wreck():
    """The chassis shudders, panels crumple in jerks, plastic crackles and lamp and grille shards trickle."""
    strain = settling(PANEL_T60_S, PANELS)
    shudder = steady(colour(rng.standard_normal(N), CHASSIS_COLOUR), span_s=0.11)
    shudder *= settling(SHUDDER_T60_S, CHASSIS)
    body = steady(colour(snaps(N, rate=500, spread_db=0.5), BODY_COLOUR), span_s=0.026)
    body *= settling(BODY_T60_S, BODY_SHELL)
    panels = strain * steady(colour(snaps(N, rate=400, spread_db=0.0), PANEL_COLOUR), span_s=0.06)
    crackle = reflect(snaps(N, CRACKLES_PER_S, spread_db=3), wet=0.6, t60=0.02)
    crackle = amp(CRACKLE_DB) * strain * steady(colour(crackle, CRACKLE_COLOUR), span_s=0.08)
    shards = reflect(snaps(N, rate=760, spread_db=-3.0), wet=0.94, t60=0.038)
    shards = settling(SHARD_T60_S, PLASTIC) * steady(colour(shards, SHARD_COLOUR), span_s=0.13)
    jerks = amp(JERK_DB * walk(JERKS_PER_S))
    return shudder + body + crackle + jerks * (panels + shards)


def crunches():
    """Each blow gives a thud of the body, a snap and clack of one bent panel and a crack of hard plastic."""
    out = np.zeros(N)
    for s, thud_hz, thud_db, clack_hz, clack_db, crack_db, t60 in CRUSH_BLOWS:
        boom = 0.56 * thud(thud_hz, t60=0.15, rise_s=0.011)
        boom += 0.47 * rattle(BODY_COLOUR, t60=0.081, rate=1500, spread_db=2.5)
        bell = ring(clack_hz, t60=1.3 * t60, rise_s=0.006)
        bell += 0.4 * ring(1.53 * clack_hz, t60, rise_s=0.004)
        clack = 0.22 * burst(bell) + 0.26 * rattle(PANEL_COLOUR, t60, rate=1100, spread_db=4.0)
        snap = 0.22 * rattle(PANEL_COLOUR, t60=0.03, rate=2500, spread_db=3)
        crack = 0.32 * rattle(SHARD_COLOUR, t60=2.8 * t60, rate=3900, spread_db=1.5)
        add(out, s, amp(thud_db) * boom + amp(clack_db) * (clack + snap) + amp(crack_db) * crack)
    return out


def impact():
    """The bumpers touch, then the body booms in its low modes while the front end buckles."""
    out = np.zeros(N)
    touch = amp(-14.0) * ring(hz=189, t60=0.044, rise_s=0.0055)
    touch += amp(-41.5) * rattle(PANEL_COLOUR, t60=0.026, rate=650, spread_db=5.5)
    add(out, TOUCH_S, touch)
    for delay, hz, db, t60 in BLOW_MODES:
        # buckling metal keeps changing stiffness, so each mode wanders
        wander = 1 + 0.04 * walk(rate=110)[:len(SHORT)]
        phase = 2 * np.pi * hz * np.cumsum(wander) / SR
        envelope = fade(SHORT, t60) * (1 - fade(SHORT, t60=0.016))
        add(out, IMPACT_S + delay, -amp(db) * np.sin(phase) * envelope)
    bite = 1 - fade(SHORT, t60=0.025)
    crush = bite * fade(np.maximum(SHORT - 0.05, 0), t60=0.083)
    for spectrum, db in ((BODY_COLOUR, -11), (PANEL_COLOUR, -20), (SHARD_COLOUR, -29)):
        fractures = colour(snaps(len(SHORT), rate=8000, spread_db=1.5), spectrum)
        add(out, IMPACT_S, amp(db) * crush * steady(fractures, span_s=0.069))
    return out


def scene():
    """Everything that reaches the microphone on the dashboard."""
    background = cabin() + tyres() + engine()
    inside = rustles() + squeak() + ticks() + scrapes() + bumps()
    crash = clatters() + debris() + cracks() + dents() + wreck() + crunches() + impact()
    return (background + inside + crash)[None]


def record(dry):
    """The microphone overloads on loud peaks; the recorder keeps only the band below its cut-off."""
    ceiling = 0.88
    clipped = dry / (1 + (dry / ceiling) ** 6) ** (1 / 6)
    return signal.sosfilt(signal.ellip(8, 0.3, 70, CUTOFF_HZ, fs=SR, output="sos"), clipped)


dry = scene()
out = record(dry)
int16_out(out)
```